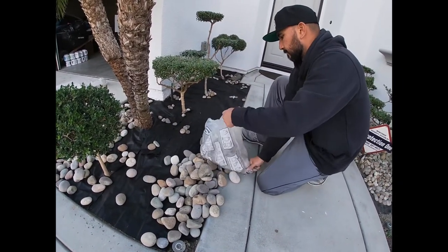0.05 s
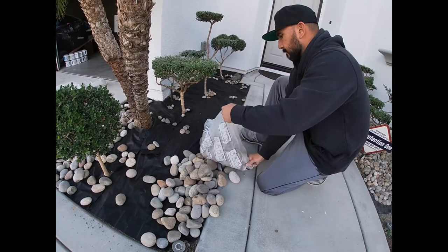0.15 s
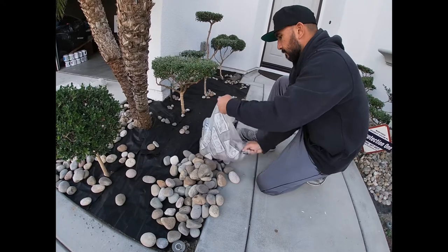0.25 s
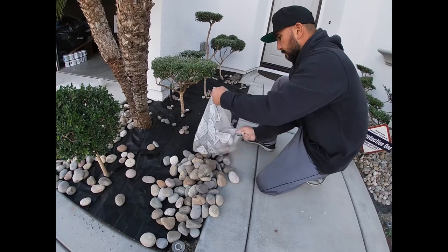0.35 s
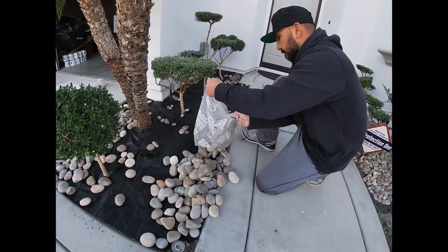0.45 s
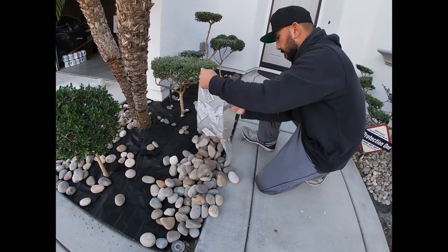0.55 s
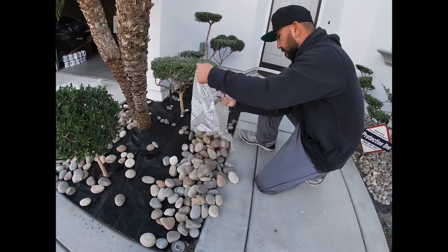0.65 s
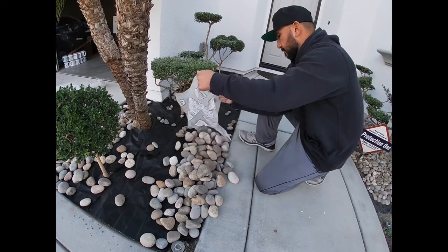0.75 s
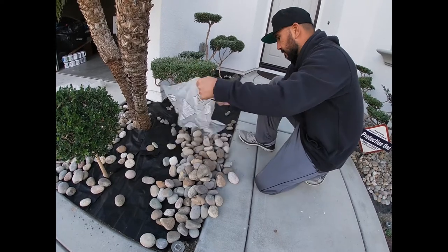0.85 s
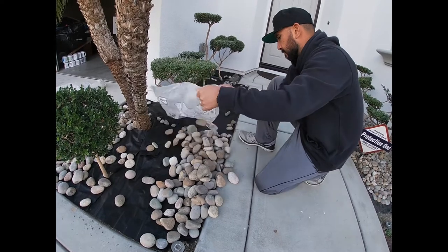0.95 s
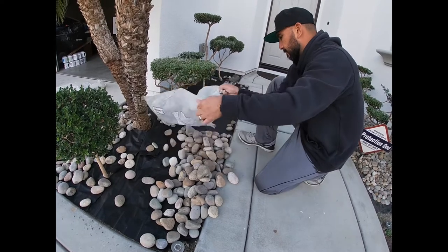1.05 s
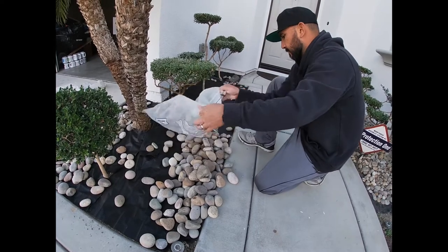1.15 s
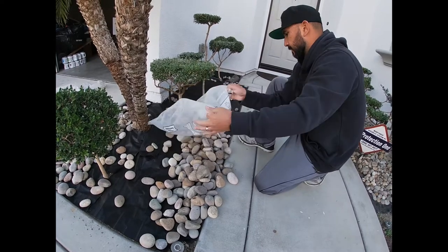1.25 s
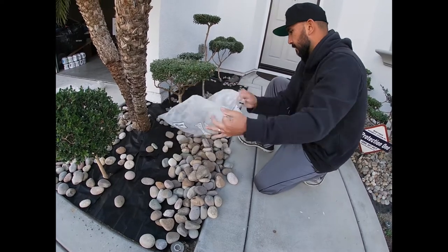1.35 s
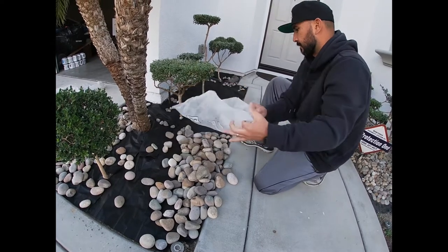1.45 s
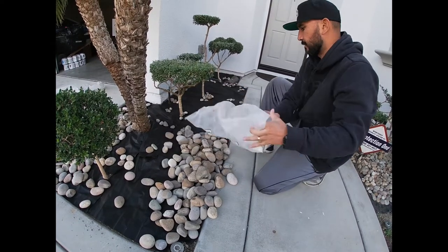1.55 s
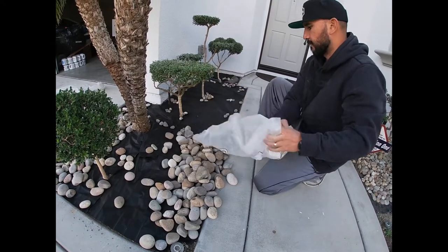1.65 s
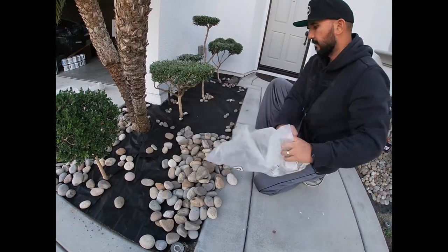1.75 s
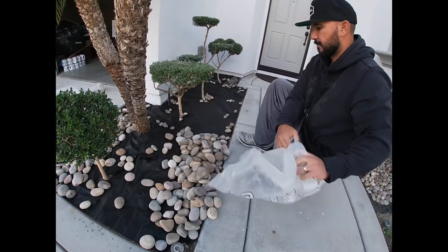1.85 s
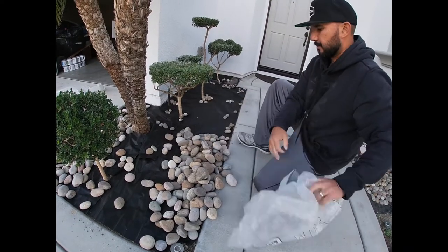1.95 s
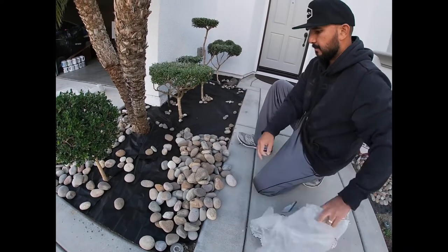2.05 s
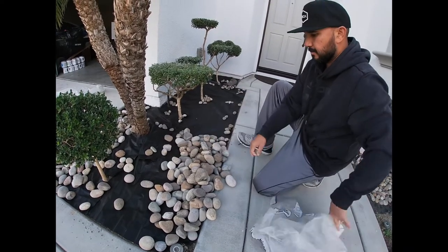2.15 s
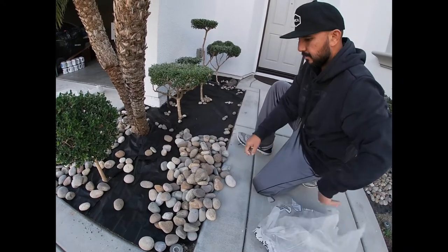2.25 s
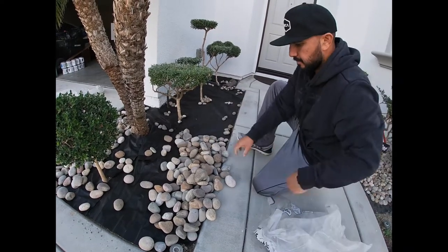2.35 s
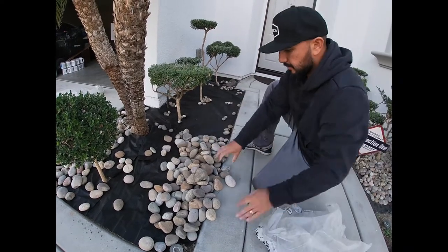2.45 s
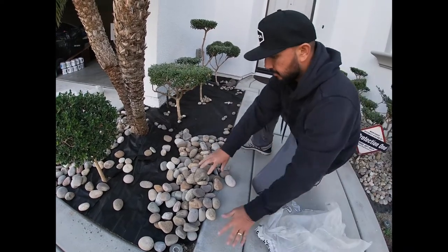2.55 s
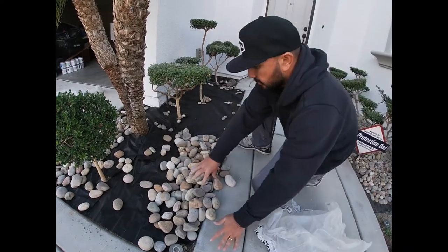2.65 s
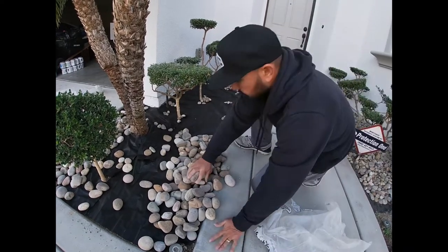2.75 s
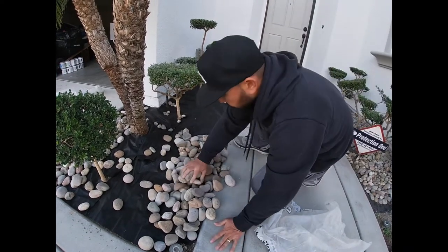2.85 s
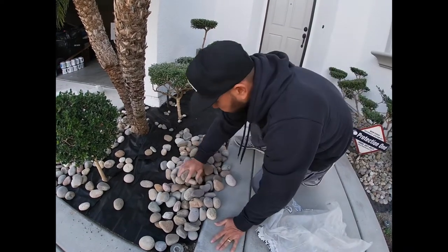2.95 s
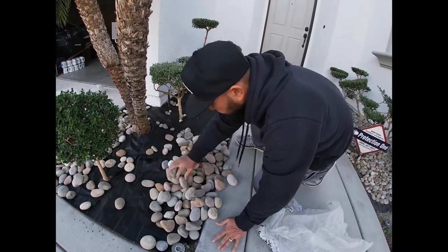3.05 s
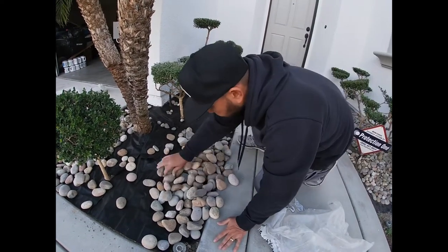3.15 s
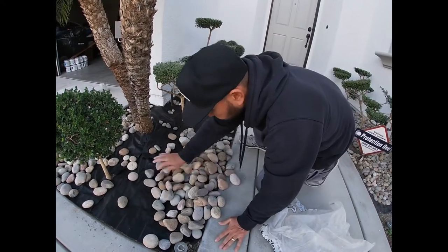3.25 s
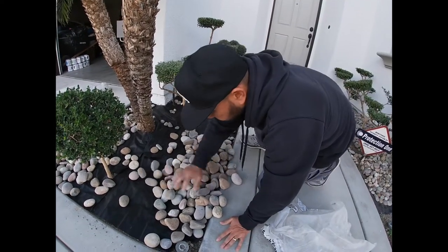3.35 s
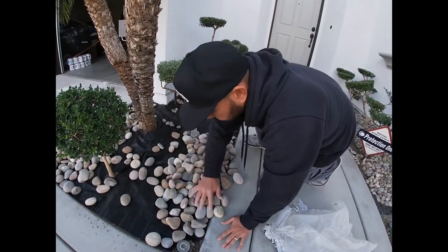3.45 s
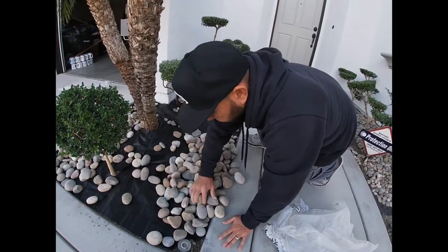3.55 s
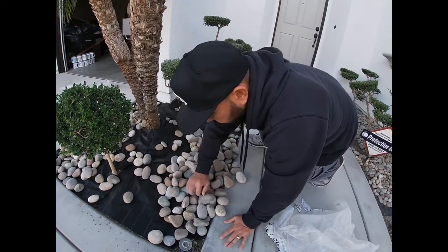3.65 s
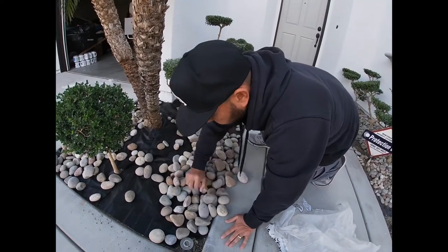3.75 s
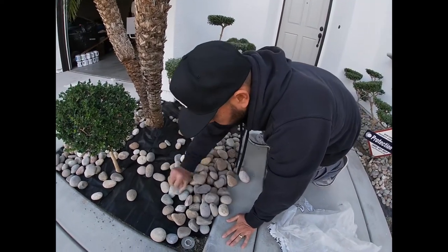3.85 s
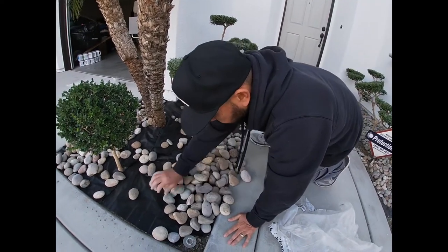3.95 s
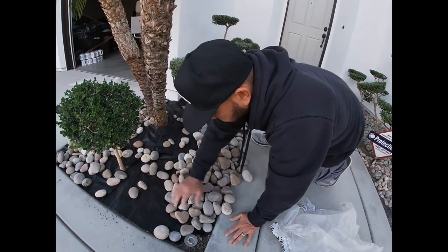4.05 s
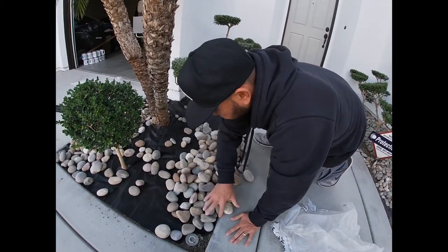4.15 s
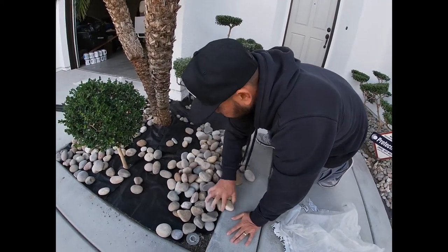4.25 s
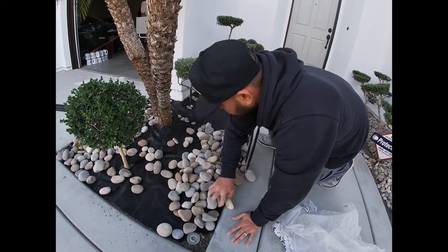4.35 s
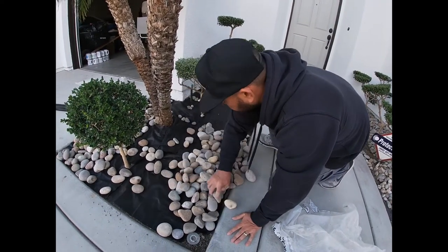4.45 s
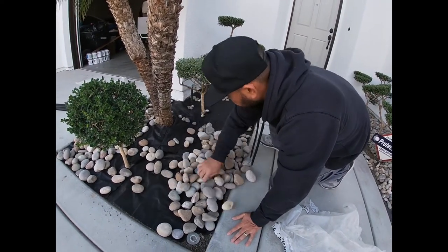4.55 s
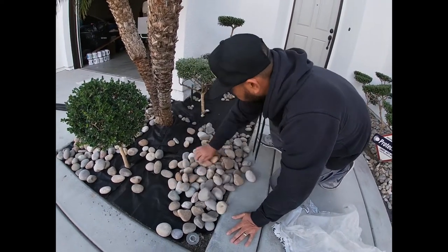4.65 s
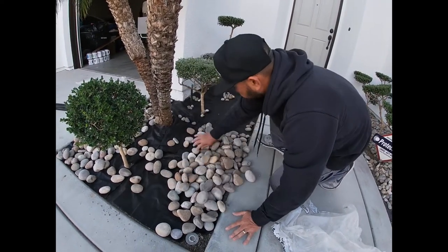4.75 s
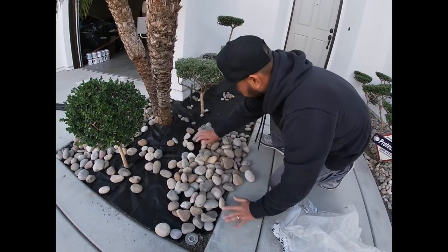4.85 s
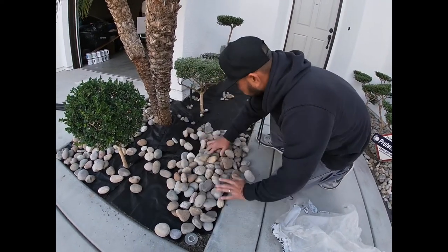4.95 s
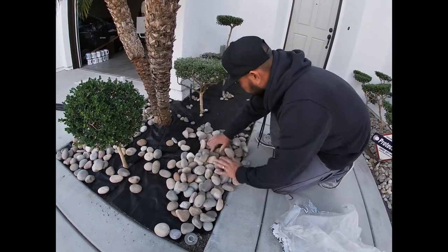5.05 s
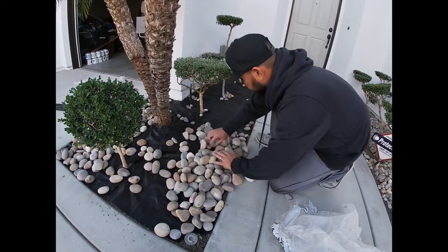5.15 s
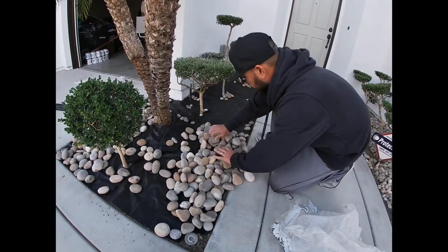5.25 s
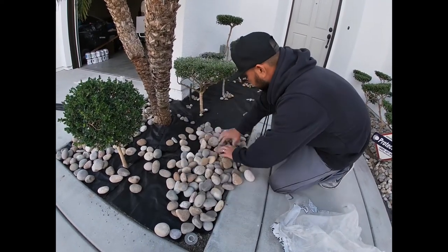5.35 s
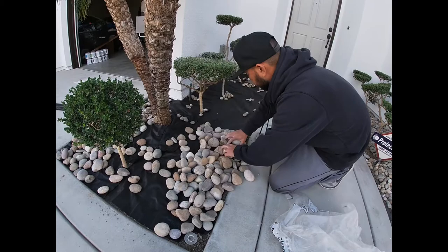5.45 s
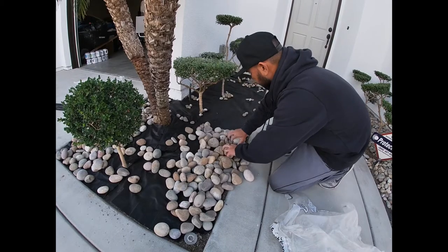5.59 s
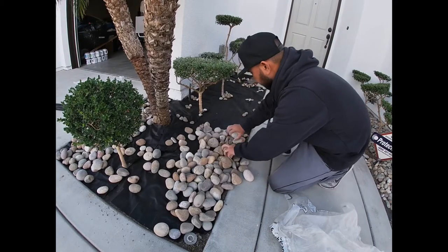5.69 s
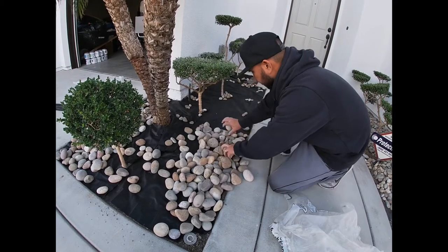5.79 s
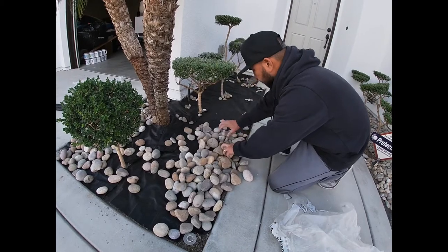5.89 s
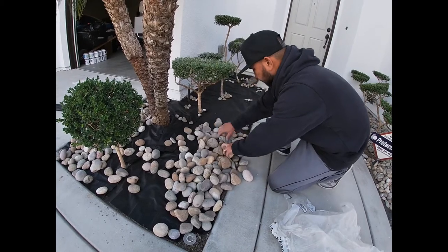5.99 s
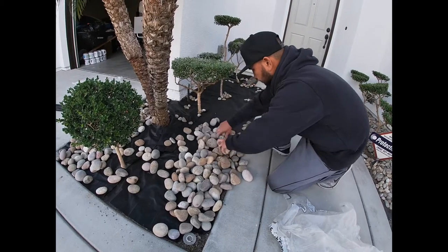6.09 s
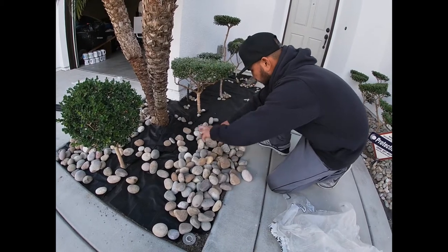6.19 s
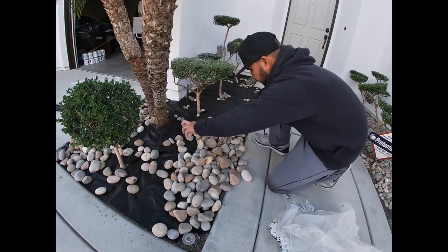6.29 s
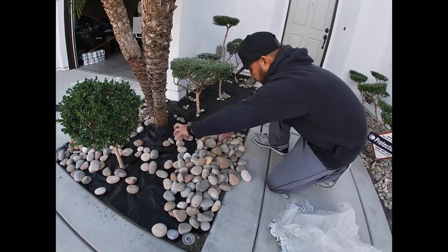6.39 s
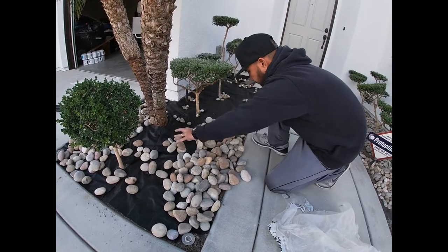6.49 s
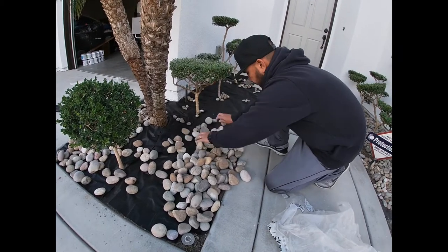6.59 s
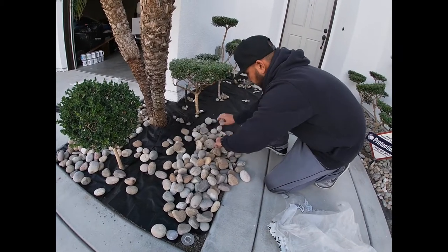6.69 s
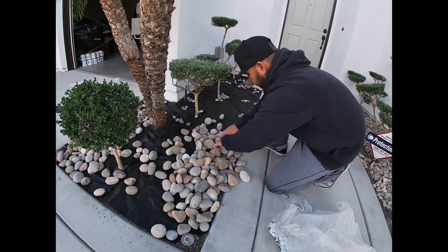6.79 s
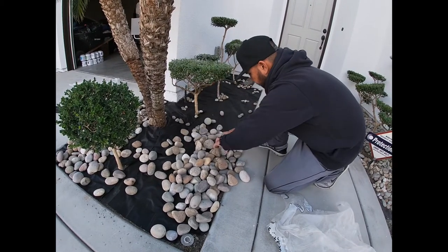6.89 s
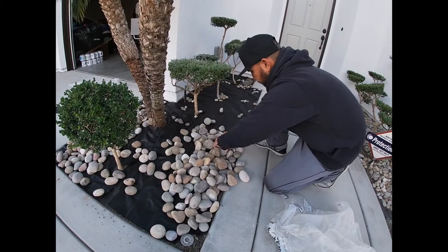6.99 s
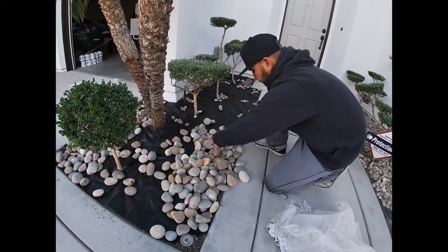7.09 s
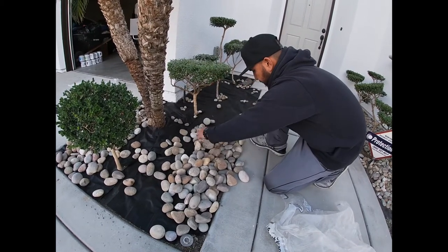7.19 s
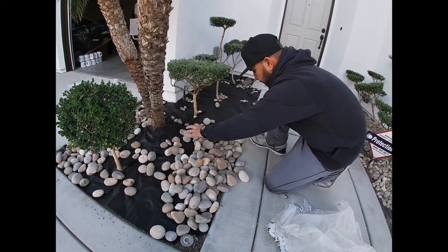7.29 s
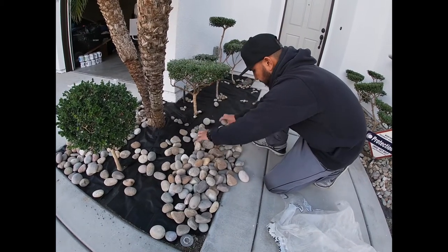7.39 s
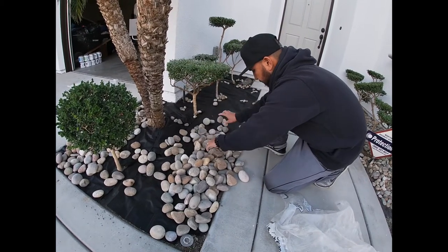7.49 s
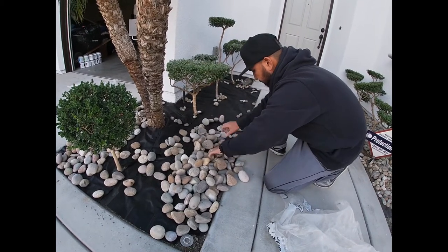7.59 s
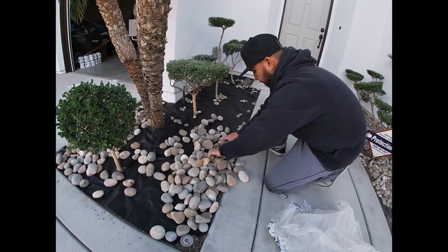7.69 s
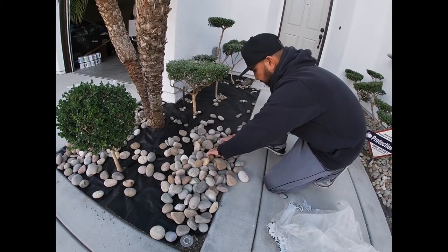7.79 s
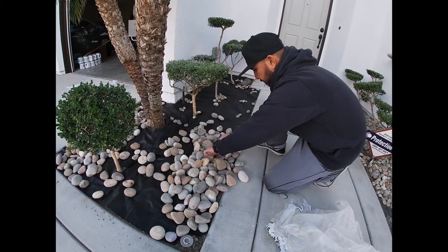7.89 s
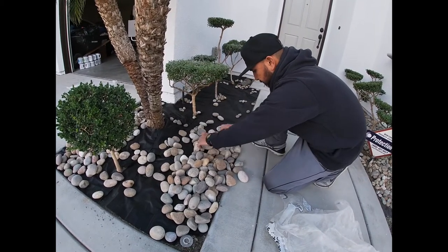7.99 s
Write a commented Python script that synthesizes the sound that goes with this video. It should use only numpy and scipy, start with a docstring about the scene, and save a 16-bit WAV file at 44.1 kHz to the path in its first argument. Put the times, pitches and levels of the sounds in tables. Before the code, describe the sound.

River pebbles tumble clattering from a crinkling plastic bag, the bag is shaken and dropped, then stones knock and rattle under a spreading hand outdoors.

```python
"""In front of a house, river pebbles are tipped out of a woven plastic bag onto a planter.
The bag is shaken empty and put down; then a hand spreads the stones, which knock, skid and rattle.
Stone contacts are short resonant pulses with scattered paths; the bag is clumped snaps over rubbing noise.
Dull bumps and low knocks are short swelling cycles. House wall and porch answer with echoes and a thin tail;
shaped noise makes the wind's rumble, the bag's low flaps and the steady distant hush of the street."""
import sys
import numpy as np
from scipy import signal
from scipy.fft import rfft, irfft
from scipy.io import wavfile
from scipy.ndimage import uniform_filter1d

SR = 44100
rng = np.random.default_rng(int(sys.argv[2]) if len(sys.argv) > 2 else 0)


def to_wav(sig):
    """Store sig (one row per channel, or 1-D mono) as 16-bit WAV at the path in sys.argv[1].

    Samples outside -1..1 are clipped; the rate is SR.
    """
    pcm = np.clip(np.atleast_2d(sig), -1, 1) * 32767
    pcm = np.round(pcm).astype(np.int16)
    wavfile.write(sys.argv[1], SR, pcm.T)  # frames by channels


N = 354123

# Single knocks of stone on stone: (time [s], energy level [dB], nominal frequency [Hz])
STONE_KNOCKS = [(0.0405, 6, 2950), (0.049, 7, 3570), (0.1225, -4, 3090), (0.3175, -1, 2800),
                (0.356, 1.5, 3250), (0.4555, 1, 2300), (0.464, 2, 3170), (0.5095, 3, 2900),
                (0.5417, 4, 3170), (0.5882, 4, 3460), (0.6084, 5.5, 3310), (0.631, 4, 2900),
                (0.6449, 5.5, 3140), (0.652, 6, 3690), (0.7132, 5.5, 3340), (0.7494, 6, 3350),
                (0.7575, 4.5, 3390), (0.8005, 4, 3600), (0.819, 2, 2800), (0.8377, 3.5, 3400),
                (0.8515, 3, 2940), (0.8802, 5.5, 3190), (0.9145, -4, 3070), (0.9885, 2, 3200),
                (0.9972, 0, 2960), (1.0186, 8.5, 3750), (1.0317, 2.5, 3550), (1.0944, -1, 3580),
                (1.1274, -4.5, 2750), (1.1851, 3.5, 3720), (1.2956, -9, 2820), (1.5053, -3.5, 3020),
                (1.5174, -7.5, 2380), (1.612, -5.5, 2840), (1.646, -4.5, 2400), (1.664, -5, 3850),
                (1.73, -5.0, 2200), (1.7839, -6, 2600), (1.8248, -3, 3290), (1.8448, -8, 2810),
                (1.877, -8.5, 2760), (2.101, -4.5, 2110), (2.2056, -8.0, 2170), (2.3075, -12, 3000),
                (2.3408, -9.5, 1770), (2.5264, -21, 2160), (2.712, 2, 2730), (2.7402, 3.5, 2670),
                (2.7781, 2.5, 3260), (2.886, 0, 3000), (2.8967, -2, 3010), (2.9301, 2, 2800),
                (2.9962, 0, 3000), (3.0338, 4.5, 2950), (3.0632, 7.5, 3130), (3.07, 5.5, 3180),
                (3.0823, 4, 3390), (3.1179, 3.5, 3700), (3.1615, 6.5, 2710), (3.1804, 1.5, 3300),
                (3.2204, 4.0, 2730), (3.272, 0.5, 2960), (3.2842, -3, 3640), (3.3282, -4.5, 3440),
                (3.3633, 0, 3570), (3.548, -2, 3000), (3.5758, -3, 2770), (3.5914, 4, 3960),
                (3.6124, 4.5, 3850), (3.645, 6, 3540), (3.7132, 4.5, 3270), (3.725, -0.5, 3030),
                (3.797, -1, 2720), (3.829, 4.0, 3270), (3.8345, 2, 3500), (3.849, -2.5, 3170),
                (3.8765, 3, 3100), (3.9614, -12.5, 2830), (4.0325, 3.5, 3630), (4.1401, -1.5, 3270),
                (4.2223, -5, 3010), (4.2903, -1.5, 2780), (4.3446, 2, 2600), (4.353, -0.5, 2840),
                (4.4673, -3, 2660), (4.535, -5, 2750), (4.5408, -1, 3000), (4.5435, 12.5, 3480),
                (4.605, 6, 3500), (4.6509, 2, 3310), (4.689, 1.5, 2750), (4.7057, 6, 3200),
                (4.7838, -4, 2900), (4.788, 7, 3200), (4.8192, 1.5, 3250), (4.8484, -2, 3150),
                (4.8608, 1.5, 3060), (4.9271, -3.0, 2750), (4.9667, -7.5, 2440), (5.0203, -3.5, 2870),
                (5.034, -2.5, 2840), (5.0768, 2, 3180), (5.1217, 3.5, 3850), (5.1482, 5.5, 2740),
                (5.1683, 5, 3230), (5.1735, 5.5, 3520), (5.189, 2, 3430), (5.2268, -3, 3240),
                (5.2607, -2.5, 3420), (5.379, -3, 3010), (5.4002, -1, 2740), (5.4834, 0.5, 3150),
                (5.5938, 2.5, 3600), (5.6911, -7, 3050), (5.77, 0, 3160), (5.9813, -4.5, 2980),
                (6.0749, -5.0, 2320), (6.445, -11, 2570), (6.4823, 9, 3880), (6.5035, -2, 2860),
                (6.705, 1.5, 3270), (6.7862, -3, 2900), (6.8819, -3, 2800), (6.9539, -5, 2890),
                (7.0273, -3, 3080), (7.1396, 0.5, 3120), (7.239, -2.5, 2250), (7.297, 1.5, 3020),
                (7.366, 3, 3410), (7.3745, 5.5, 3250), (7.402, -0.5, 3400), (7.548, -3, 3480),
                (7.7676, -9, 2620), (7.8437, -3, 2650), (7.8607, -6, 3220)]


def from_db(db):
    """Amplitude law of the decibel: 20 dB is a factor of ten in gain."""
    return 10 ** (np.asarray(db) / 20)


def rms_one(x):
    """Normalise mean power: scale to an rms of 1."""
    return x / np.sqrt(np.mean(x ** 2) + 1e-20)


def energy_one(x):
    """Normalise energy: scale each row to a sum of squares of 1."""
    return x / np.sqrt(np.sum(x ** 2, axis=-1, keepdims=True) + 1e-20)


def level(rows):
    """Level envelope: rows of (time [s], level [dB]) interpolated in dB to a gain for every sample."""
    return from_db(np.interp(np.arange(N) / SR, *np.transpose(rows)))


def response(colour, size):
    """Minimum phase: folding the cepstrum makes a causal response through (frequency [Hz], gain [dB])."""
    hz, db = np.transpose(colour)
    grid = np.maximum(np.fft.rfftfreq(size, 1 / SR), 1)
    gain = from_db(np.interp(np.log(grid), np.log(hz), db))
    cepstrum = irfft(np.log(gain))
    cepstrum[1:size // 2] *= 2
    cepstrum[size // 2 + 1:] = 0
    return np.exp(rfft(cepstrum))


def coloured(x, colour):
    """Linear filtering: convolve x with the impulse response of a colour; rms 1."""
    impulse_response = irfft(response(colour, size=8192))
    return rms_one(signal.fftconvolve(x, impulse_response)[:N])


def evened(x, span_s):
    """Level compression: hold the running rms near 1, keeping the grain faster than the span."""
    width = max(int(span_s * SR), 2)
    power = uniform_filter1d(uniform_filter1d(x ** 2, width), width)
    return x / np.sqrt(power + 1e-3)


def flicker(per_s, depth_db):
    """Random amplitude modulation: a gain that wanders between random dB values, per_s of them a second."""
    knots = rng.standard_normal(2048)
    wander = np.interp(np.arange(N) / SR * per_s, np.arange(len(knots)), knots)
    return from_db(depth_db * wander)


def moves(rows, attack_s, release_s):
    """Power addition of (start [s], length [s], level [dB]) moves: each swells, holds and dies away."""
    t = np.arange(N) / SR
    power = 0
    for start, length, db in rows:
        attack = np.clip((t - start) / attack_s, 0, 1)
        release = np.exp(-np.clip((t - start - length) / release_s, 0, 20))
        power = power + (from_db(db) * attack * release) ** 2
    return np.sqrt(power)


def clacks(times, gains, hz, sharpness, scatter_db, hollow_db, hollow_s=0.0038, scatter_s=0.011, soft=1.216):
    """Impact excitation and scattering: a brief pulse takes several paths and rings in a gap between stones."""
    # Colour shared by all stone contacts: (frequency [Hz], gain [dB])
    stone_colour = [(150, -1), (480, -12.5), (800, 4), (1200, 0), (1900, 2), (3000, 1.3), (4400, 2),
                    (5900, 0), (6600, -6.5), (7400, -14), (9000, -24.5), (14000, -34)]
    size, count, lead = 512, 8, 32   # samples in a wave, random draws, samples ahead of the contact
    winding = 1.2   # how far the heap draws out each pulse (a Q)
    chance = rng.random((len(times), 2, count))
    f = np.fft.rfftfreq(size, 1 / SR)

    s = 1j * f / hz[:, None]
    pulse = s / (1 + s / sharpness + s * s)   # sharpness is the Q of the jolt
    pulse /= 1 + np.sqrt(2) * s / soft + (s / soft) ** 2   # the higher hz, the more treble passes
    pulse *= (1 - s / winding + s * s) / (1 + s / winding + s * s)   # all-pass: phase only

    # Each contact has its own gap, tuned at random around its nominal frequency
    gap = 1j * f / (hz[:, None] * 2 ** (chance[:, 0, :1] - 2 / 3))
    damping = 1 / (np.pi * hz[:, None] * hollow_s)
    paths = 1 + from_db(hollow_db) * damping * gap / (1 + damping * gap + gap * gap)

    for late, strength in chance.transpose(2, 1, 0)[1:]:
        delay = .0004 + .005 * late ** 2
        share = from_db(scatter_db) * (2 * strength - 1) * np.exp(-delay / scatter_s)
        paths += share[:, None] * np.exp(-2j * np.pi * f * delay[:, None])

    waves = irfft(pulse * paths * response(stone_colour, size=size))
    waves = np.roll(waves, lead, axis=1) * signal.windows.tukey(size, 2 * lead / size)
    waves = gains[:, None] * energy_one(waves)
    at = np.maximum(times * SR - lead, 0).astype(int)[:, None] + np.arange(size)
    return np.bincount(at.ravel(), waves.ravel(), N)[:N]


def motion(run_out_s=0.11):
    """Power addition of independent motions: pouring, pushing by hand and settling after a knock; a gain."""
    # Stones tumbling out of the bag: (time [s], level before the pour gain [dB])
    pour_levels = [(0.0, -35), (0.044, -35), (0.054, -23), (0.104, -36), (0.266, -27), (0.82, -22.3),
                   (0.97, -36.5)]
    # The hand pushes through the stones: (start [s], length [s], level of motion [dB])
    pushes = [(2.708, .075, -32), (2.81, .20, -38.5), (3.01, .20, -30), (3.37, .10, -42),
              (3.48, 0.064, -32), (3.56, .21, -37), (4.195, .20, -34.5), (4.61, 0.072, -32),
              (4.78, .09, -35), (4.96, 0.077, -39.5), (5.05, 0.23, -31.5), (5.33, .05, -42),
              (5.37, .15, -32.5), (5.53, 0.12, -38), (5.66, 0.11, -42.5), (5.88, 0.042, -43),
              (5.99, 0.17, -46), (6.21, 0.13, -45), (6.38, 0.12, -46), (6.56, 0.21, -45),
              (6.72, 0.11, -41.5), (6.96, .22, -42.5), (7.23, .22, -40), (7.54, .04, -32),
              (7.68, 0.24, -42), (7.965, .02, -37)]
    pour_db = -2.5
    settle_db, settle_follows = -40.5, 0.78   # offset, and share of a knock's level that is followed
    settle_s = .05   # amplitude decay time

    since_last = np.arange(N) / SR - pour_levels[-1][0]
    run_out = np.exp(-np.clip(since_last / run_out_s, 0, 20))
    pour = from_db(pour_db) * level(pour_levels) * run_out

    times, db, _ = np.transpose(STONE_KNOCKS)
    blows = np.bincount((times * SR).astype(int), from_db(settle_follows * db + settle_db) ** 2, N)
    settling_power = signal.lfilter([1], [1, -np.exp(-2 / (settle_s * SR))], blows + 1e-18)

    pushing = moves(pushes, attack_s=0.01, release_s=.018)
    return np.sqrt(pour ** 2 + pushing ** 2 + settling_power)


def upset(settle_s=0.074, kick=0.53):
    """Exponential relaxation: every knock upsets its neighbours, bunching the rattle after it; a gain near 1."""
    blows = np.zeros(N)
    blows[(np.array(STONE_KNOCKS)[:, 0] * SR).astype(int)] = 1
    decay = np.exp(-1 / (settle_s * SR))
    stir = 1 + kick * signal.lfilter([1], [1, -decay], blows + 1e-18)
    return evened(stir, span_s=0.042)


def rattle(spread_octaves=.27, bounce_s=.008, loss_db=-5.0, full_db=-27.5, count=3):
    """Random impacts with inelastic bounces: gentler motion moves fewer stones, and they sound duller."""
    per_s, spread_db = 170, 6.5   # candidate stones a second; spread of their force
    tumble_hz = 3300   # centre of the light contacts at full tumble
    brighten_octaves_per_db = 0.034
    start_s = .0015   # time over which the rattle's level swells smoothly, never in a step
    rattle_db = 0.2

    stones, moving = int(per_s * N / SR), motion()
    force, pebble, hop = rng.standard_normal((stones, 3)).T[:, :, None]
    start = (np.arange(stones)[:, None] + rng.random((stones, 1))) / stones * N / SR
    moving_db = 20 * np.log10(moving[(start * SR).astype(int)])
    vigour_db = np.maximum(moving_db - full_db, -40)
    takes_part = rng.random(start.shape) < np.sqrt(from_db(vigour_db)) + 1 / 4

    bounce = np.arange(count)
    times = start + bounce_s * np.exp(hop / 2) * np.sqrt(bounce)   # the hops get shorter
    gains = from_db(spread_db * np.minimum(force, 1) + loss_db * bounce) * takes_part
    octaves = brighten_octaves_per_db * vigour_db + spread_octaves * pebble
    hz = np.repeat(tumble_hz * 2 ** octaves, count)
    contacts = clacks(times.ravel(), gains.ravel(), hz, sharpness=1.15, scatter_db=-2.0, hollow_db=7.0)

    ease = np.exp(-1 / (start_s * SR))
    swell = signal.lfilter([(1 - ease) ** 2], [1, -2 * ease, ease ** 2], moving * upset())
    return from_db(rattle_db) * swell * evened(rms_one(contacts), span_s=0.072)


def bag(rub_db=-9.0, clump_db=2.5):
    """Buckling and friction: creases snap over the hiss of rubbing weave, folds of every size in turn."""
    # Colour of the creasing plastic: (frequency [Hz], filter gain [dB])
    bag_colour = [(60, -6), (220, 8), (480, -2), (850, 1.5), (1300, -0.5), (2200, 1), (4000, -3),
                  (6000, -12), (7500, -27), (10500, -34.5), (13500, -38.5), (16000, -45)]
    # The bag is lifted, emptied, pulled clear, shaken and put down:
    # (start [s], length [s], level before the bag gain [dB])
    bag_moves = [(0.0, 0.15, -32), (.19, 0.39, -31), (.62, 0.39, -38.5), (1.08, 0.18, -46),
                 (1.34, 0.44, -38.5), (1.495, .03, -32), (1.60, .045, -36), (1.968, .05, -34),
                 (2.065, .05, -33), (2.165, .04, -32), (2.302, .01, -41)]
    bag_db = 1
    per_s, spread_db, fold_db = 450, 4.2, 2.8   # snaps a second in each band; their spread; band flicker

    edges, crackle = np.geomspace(90, 16000, 14), 0   # band edges in Hz
    for low, high in zip(edges, edges[1:]):
        strength = from_db(spread_db * np.minimum(rng.exponential(1, N), 4))
        snaps = (rng.random(N) < per_s / SR) * strength * rng.choice([-1, 1], N)
        rubbing = from_db(rub_db) * rng.standard_normal(N)
        drive = rms_one(snaps) + rubbing
        fold = signal.butter(2, [low, high], "band", fs=SR, output="sos")
        # Each band flickers on its own, so the colour keeps shifting
        crackle = crackle + signal.sosfilt(fold, drive * flicker(per_s=60, depth_db=fold_db))

    crackle = coloured(crackle * flicker(per_s=130, depth_db=clump_db), bag_colour)
    handling = moves(bag_moves, attack_s=0.012, release_s=0.045)
    return from_db(bag_db) * handling * evened(crackle, span_s=0.053)


def wind_and_flaps(burble_hz=200, burble_db=-14.0):
    """Turbulent pressure: eddies at the microphone port rumble with breeze and puffs; small ones burble higher."""
    # Colour of the wind: (frequency [Hz], relative spectral density [dB])
    wind_colour = [(12, -21), (28, -0.5), (75, -1), (140, -6.5), (230, -16.5), (320, -24), (480, -38),
                   (3000, -81)]
    # Strength of the breeze: (time [s], level before the breeze gain [dB])
    breeze = [(0.0, -52), (0.49, -46.5), (1.19, -53), (1.74, -46.5), (3.26, -41), (3.45, -50), (3.69, -53),
              (4.52, -40.5), (5.97, -45.5), (6.11, -55.5), (6.37, -54), (6.53, -35.5), (7.51, -35.5),
              (7.65, -38.5), (8.03, -40)]
    # Low puffs: the first three are flaps of the bag, the others short wind buffets:
    # (time of the peak [s], level of the swell [dB])
    low_puffs = [(1.63, -36), (1.865, -36), (2.055, -34), (2.585, -29), (3.21, -32), (3.28, -34),
                 (4.11, -37), (4.323, -31), (4.50, -31), (4.571, -28), (4.796, -36), (4.97, -32),
                 (5.117, -32), (5.18, -32), (5.25, -35), (5.458, -36), (5.825, -37), (6.024, -36),
                 (6.417, -29), (6.517, -31), (6.65, -25), (6.737, -32), (6.878, -26), (7.115, -23),
                 (7.16, -28), (7.331, -25), (7.49, -27), (7.54, -24), (7.625, -29)]
    breeze_db, puff_width_s = 3.3, 0.022   # the width is the standard deviation of a bell-shaped swell

    eddies = evened(coloured(rng.standard_normal(N), wind_colour), span_s=.05)
    band = signal.butter(2, [burble_hz / 2, burble_hz * 1.2], "band", fs=SR, output="sos")
    small = signal.sosfilt(band, rng.standard_normal(N))
    burble = rms_one(small * flicker(per_s=35, depth_db=5.0))
    lumps = rms_one(flicker(per_s=40, depth_db=2.0))

    t = np.arange(N) / SR
    puffs = sum(from_db(db) * np.exp(-.5 * ((t - s) / puff_width_s) ** 2) for s, db in low_puffs)
    strength = np.hypot(from_db(breeze_db) * level(breeze), puffs)
    return strength * lumps * (eddies + from_db(burble_db) * burble)


def street_hush():
    """Stationary noise: the distant hush of the street is steady random noise, strongest in the bass."""
    # Colour of the hush: (frequency [Hz], relative spectral density [dB])
    hush_colour = [(30, 13.5), (150, 16.5), (450, 1.5), (850, 5.5), (3000, -13), (6000, -22), (8000, -30),
                   (16000, -63.5)]
    hush_db = -49
    return from_db(hush_db) * coloured(rng.standard_normal(N), hush_colour)


def knocks():
    """Hard impact: each single blow of stone on stone is a sharp resonant pulse of given energy."""
    times, db, hz = np.transpose(STONE_KNOCKS)
    return clacks(times, from_db(db), hz, sharpness=2.6, scatter_db=-3.5, hollow_db=-4.5)


def bumps():
    """Damped oscillation: dull bumps and low knocks are a few cycles that swell and quickly die."""
    # Dull bumps and low knocks: (time [s], peak level of the envelope [dB], frequency [Hz])
    dull_bumps = [(0.213, -28, 230), (0.233, -25, 290), (0.295, -32, 200), (0.379, -29, 207),
                  (0.498, -28, 272), (0.693, -31, 167), (3.335, -28, 303), (4.005, -35, 287),
                  (7.123, -25, 1500), (7.162, -28, 900), (7.211, -30, 950)]
    rise_cycles = 0.8
    out = np.zeros(N)
    for s, db, hz in dull_bumps:
        cycles = hz * np.maximum(np.arange(N) / SR - s, 0)
        age = np.minimum(cycles / rise_cycles, 20)
        envelope = from_db(db) * age * np.exp(1 - age)
        out += envelope * np.sin(2 * np.pi * cycles)
    return out


def skids(sharpness=6.5):
    """Stick-slip friction: a quick, uneven run of ringing slips, all with one nominal frequency."""
    # A stone skids over its neighbour:
    # (start [s], length [s], energy level of the whole skid [dB], frequency [Hz])
    stone_skids = [(0.277, .008, 2, 2500), (0.364, .008, 4, 3200), (0.691, .010, 8, 3400),
                   (3.0133, .012, 5, 3250), (3.05, .012, 7, 3100), (3.486, .010, 5, 3400),
                   (3.507, .012, 1, 3000), (4.2007, .009, 2, 2900), (6.869, .007, 4, 2900),
                   (7.269, .010, 3.5, 3150), (7.714, .008, -5, 2400)]
    slip_s = .003   # mean time from one slip to the next
    out = np.zeros(N)
    for start, length, db, hz in stone_skids:
        count = max(round(length / slip_s), 2)
        late, force = rng.standard_normal((2, 32))[:, :count]
        times = start + slip_s * np.abs(np.arange(count) + late / 5)
        gains = np.exp(force / 3)
        slips = clacks(times, gains, np.full(count, hz), sharpness, scatter_db=-10, hollow_db=-6)
        out += from_db(db) * energy_one(slips)
    return out


def yard(x, wall_s=0.02, wall_spread_s=0.0045, tail_db=-17.0, t60=0.62):
    """Reflection and reverberation: a cluster of echoes from the house wall, and a thin tail from the porch."""
    wall_db = -13.0
    t = np.arange(SR // 2) / SR
    paths = rng.standard_normal(len(t)) * (rng.random(len(t)) < 1 / 10)   # sparse echoes
    wall = energy_one(paths * np.exp(-.5 * ((t - wall_s) / wall_spread_s) ** 2))
    tail = energy_one(rng.standard_normal(len(t)) * from_db(-60 * t / t60) * (t > .003))
    reflections = from_db(wall_db) * wall + from_db(tail_db) * tail
    return x + signal.fftconvolve(x, reflections)[:N]


def scene():
    """Superposition: stones and bag in the yard, plus wind, flaps and street, the same in both channels."""
    handling = rattle() + bag() + knocks() + bumps() + skids()
    sound = yard(handling) + wind_and_flaps() + street_hush()
    return np.stack([sound, sound])


def record(dry):
    """Clipping and band limiting: peaks beyond full scale are clipped, then the top is cut."""
    low_pass = signal.cheby2(12, 70, 16500, fs=SR, output="sos")   # 70 dB down from 16500 Hz up
    return signal.sosfilt(low_pass, np.clip(dry, -1, 1))


dry = scene()
out = record(dry)
to_wav(out)
```